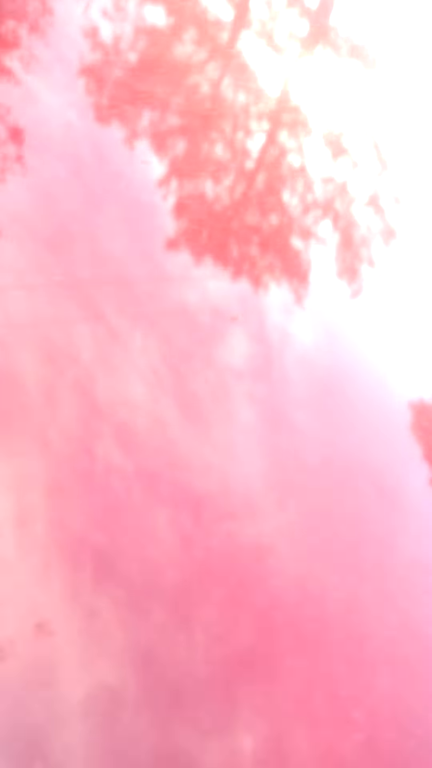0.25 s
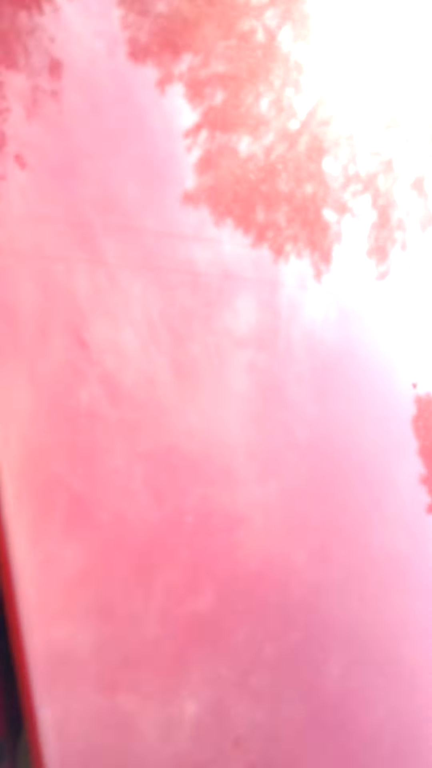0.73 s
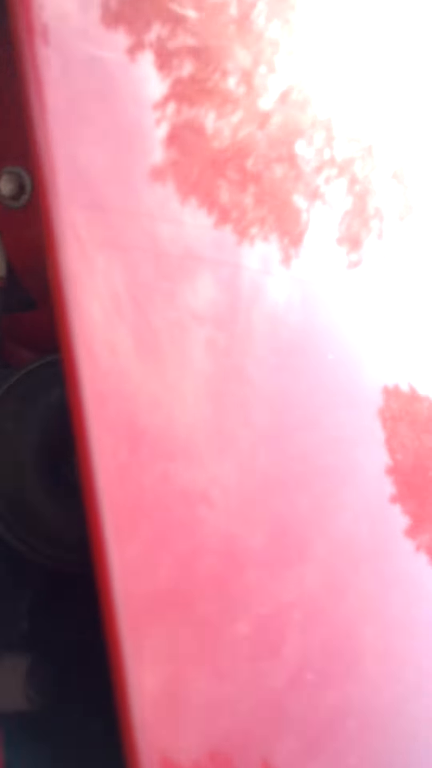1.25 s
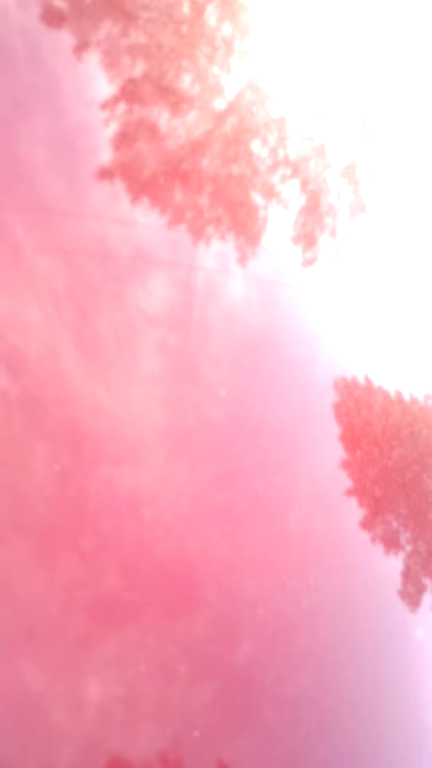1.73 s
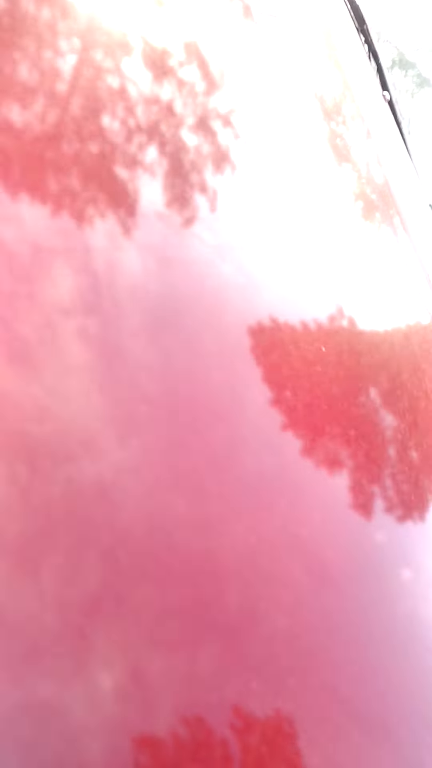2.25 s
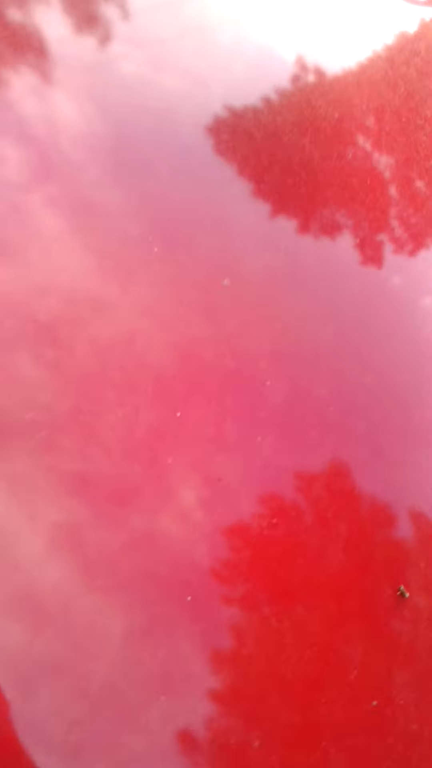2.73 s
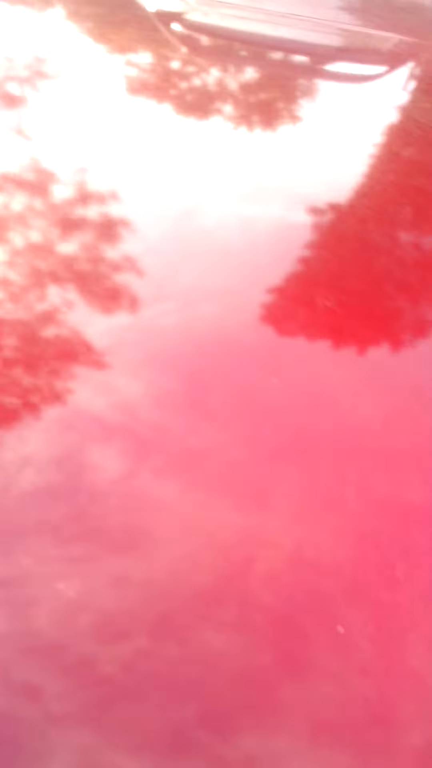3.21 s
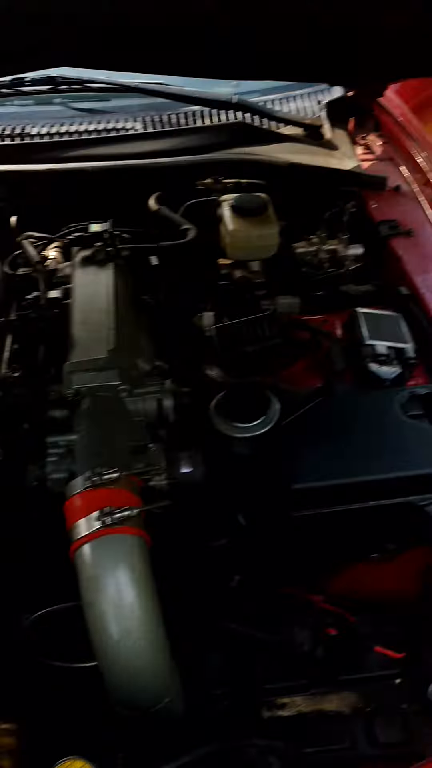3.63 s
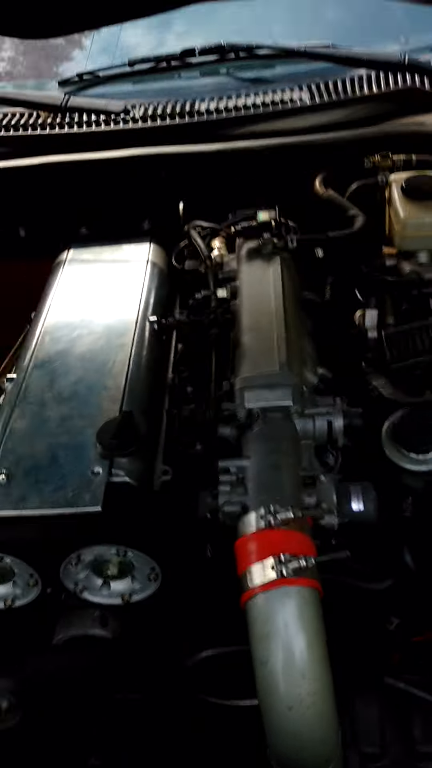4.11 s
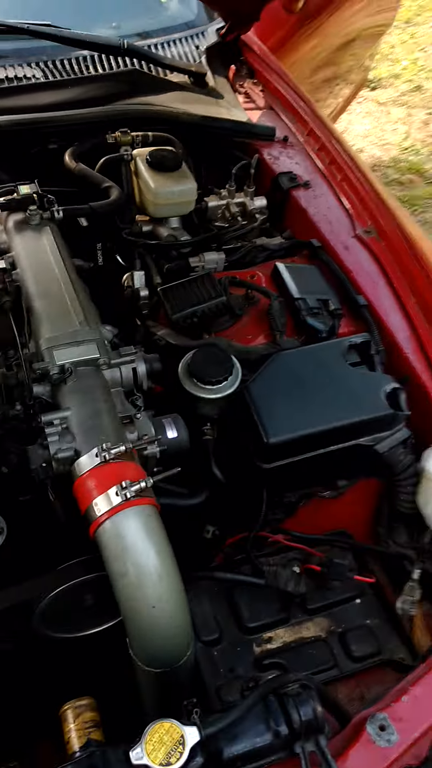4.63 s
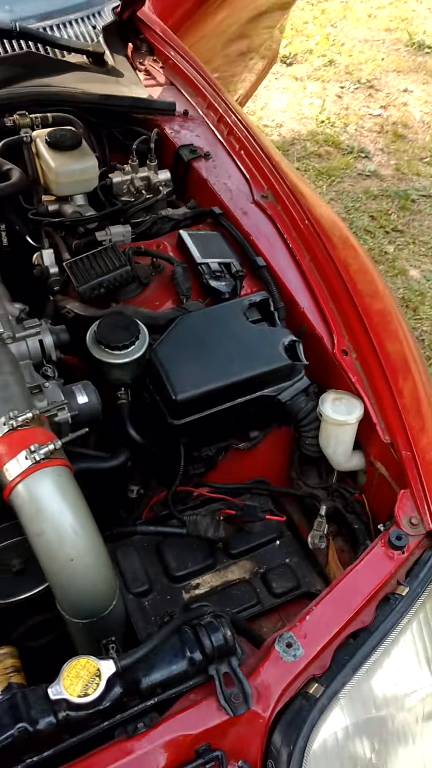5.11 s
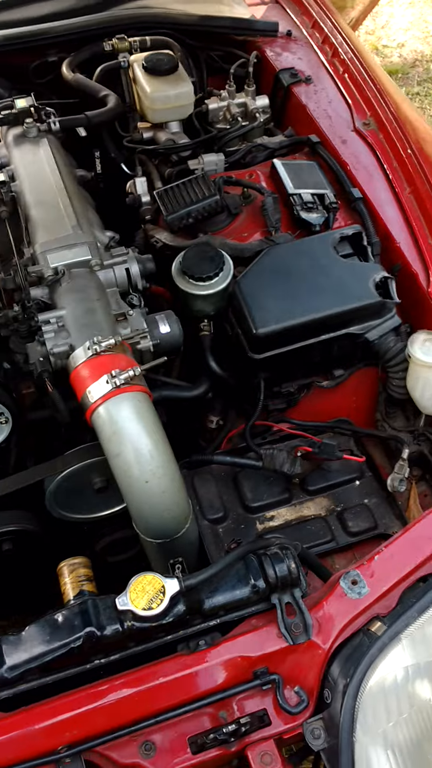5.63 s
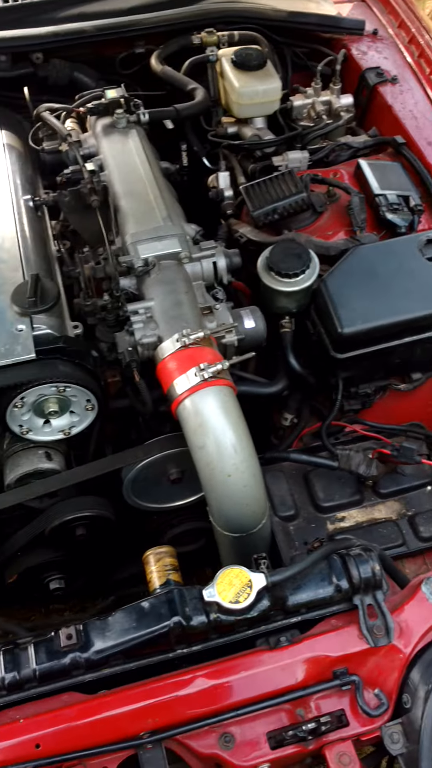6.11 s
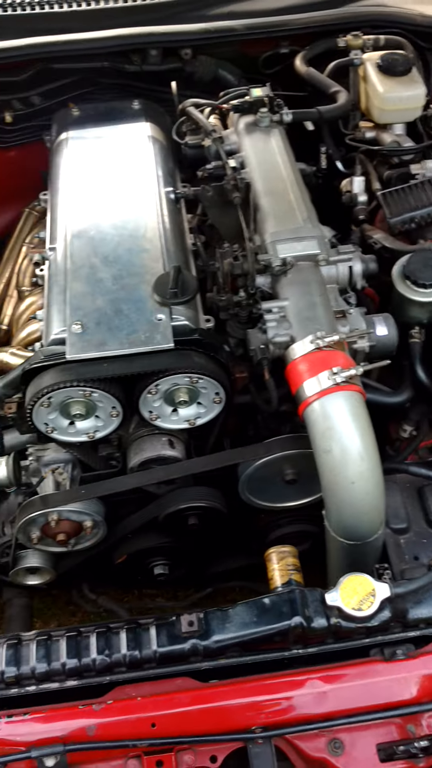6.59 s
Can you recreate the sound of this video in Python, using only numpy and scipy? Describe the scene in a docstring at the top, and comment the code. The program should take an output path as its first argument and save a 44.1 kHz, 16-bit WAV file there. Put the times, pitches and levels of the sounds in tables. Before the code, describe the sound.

Close metallic latch clicks and rattles, a burst of loud clanks, then a car hood creaking and knocking upward outdoors, with faint birds and insects.

```python
"""Opening a car hood outdoors

Close to a hand-held phone a car hood is unlatched, lifted and propped: clicks, clunks and scrapes.
Steel is shaped noise through latch resonances; the panel is a bank of ringing modes, with thin spring tones.
Behind it far traffic, a hum, leaves and crickets are noise bands; birds are gliding tones.
Wind is low noise and single puffs at the microphone.
The phone widens its two ports by taking a delayed copy of each from the other."""
import sys
import numpy as np
from scipy.fft import rfft, irfft, next_fast_len
from scipy.io import wavfile
from scipy.ndimage import uniform_filter1d, map_coordinates

SR = 44100
rng = np.random.default_rng(int(sys.argv[2]) if len(sys.argv) > 2 else 0)


def master_out(mix):
    """Clip the mix to full scale and print it as 16-bit PCM to the path in sys.argv[1]."""
    frames = np.transpose(np.atleast_2d(mix))
    ceiling = np.clip(frames, -1, 1)
    pcm = np.round(ceiling * 32767).astype(np.int16)
    wavfile.write(sys.argv[1], SR, pcm)


N = 302448

# port difference of sound from far off: f/Hz, level against the sum/dB
FAR_APART = [(60, -20.5), (500, -6.5), (900, -2), (2000, 2.5), (3000, 0), (15000, 0)]
# port difference of sound close to the microphone: f/Hz, level against the sum/dB
NEAR_APART = [(60, -17.5), (250, -15), (900, -1.5), (1600, 3.5), (2300, 9.5), (3200, 0.5), (15000, 2)]
# modes of the hood panel: f/Hz, relative level/dB, usual t60/s
PANEL_MODES = [(99, -8, 0.049), (128, -4, 0.15), (153.4, -5.5, 0.14), (195, -5, .08), (225.3, -11.5, 0.31),
               (232.7, 2.5, 0.066), (279, -6, .14), (310, -2.5, 0.11), (349.5, 0, 0.066), (408, -4, .11),
               (455.3, -3, 0.054), (513, -3.5, 0.092), (590.6, -4, 0.087), (658, -5, 0.1),
               (757, -7.5, 0.02), (850, -9.5, .07)]


def amp(db):
    """dB to gain."""
    return 10 ** (np.asarray(db) / 20)


def unit(x):
    """Scaled to rms 1."""
    return x / np.sqrt(np.mean(x ** 2) + 1e-20)


def along(points, hz):
    """Values of (Hz, value) points, joined on a log frequency axis and held beyond the ends."""
    f, value = np.transpose(points)
    return np.interp(np.log(hz + 1), np.log(f + 1), value)


def curves(rows):
    """One value per sample for each column after the time."""
    s, *columns = np.transpose(rows)
    return np.array([np.interp(np.arange(N) / SR, s, column) for column in columns])


def wobble(rate):
    """A smooth random curve, rate knots a second."""
    knots = rng.standard_normal(int(N * rate / SR) + 4)
    return map_coordinates(knots, [np.arange(N) * rate / SR])


def filtered(x, response):
    """x through a complex response of frequency."""
    m = next_fast_len(N + SR // 2)
    spectrum = rfft(x, m) * response(np.fft.rfftfreq(m, 1 / SR))
    return irfft(spectrum, m)[..., :N]


def ports(pair, colour, apart):
    """Coloured sum and difference signals, as heard at the two ports."""
    mid, side = filtered(pair, lambda hz: colour(hz) * amp([0 * hz, along(apart, hz)]))
    return np.array([mid + side, mid - side])


def hiss(spectrum, apart):
    """Noise of rms 1 at the two ports; the spectrum falls on for an octave beyond its ends."""
    closed = [(spectrum[0][0] / 2, -90)] + spectrum + [(spectrum[-1][0] * 2, -90)]
    return unit(ports(rng.standard_normal((2, N)), lambda hz: amp(along(closed, hz)), apart))


def note(s, length):
    """Share of a note gone by, and its soft swell."""
    u = np.clip((np.arange(N) / SR - s) / length, 0, 1)
    return u, np.sqrt(np.abs(np.sin(np.pi * u)))


def traffic(db):
    """Far traffic: low noise, slowly unsteady."""
    # relative spectrum: f/Hz, level per Hz/dB
    rumble_band = [(20, -28), (60, -0.5), (120, 2.5), (250, -4.5), (500, -10), (900, -20.5)]
    return amp(db + 1.2 * wobble(7.2)) * hiss(rumble_band, FAR_APART)


def hum(db):
    """A far mid hum: a noise band with two slow random level curves."""
    # relative spectrum: f/Hz, level per Hz/dB
    hum_band = [(400, -13.5), (800, 5), (1400, 5.5), (2200, 3), (3000, 2.5), (4500, -16.5)]
    return amp(db + wobble(6.9) + 2.5 * wobble(6)) * hiss(hum_band, FAR_APART)


def leaves(db):
    """Rustling leaves: high noise flickering at slow and fast rates."""
    # relative spectrum: f/Hz, level per Hz/dB
    rustle_band = [(1500, -34), (3000, -5), (4500, 2), (8000, -1.5), (11000, -4.5), (15500, -9.5)]
    flicker_db = 1.1 * wobble(25) + wobble(200) + 1.5 * wobble(4)
    return amp(db + flicker_db) * hiss(rustle_band, FAR_APART)


def crickets():
    """Several singers, each a narrow noise swelling at its own chirp rate."""
    # singers: f/Hz, width/Hz, relative level/dB, chirps per second
    singers = [(6470, 130, -4.5, 8), (7200, 110, -4, 4.1), (7150, 63, -4, 30), (7300, 580, 2.5, 55),
               (7470, 130, -5.5, 140)]
    t = np.arange(N) / SR
    song = 0
    for hz, width, db, rate in singers:
        phase = 2 * np.pi * rate * t + .6 * wobble(3)
        swell = (.5 + .5 * np.cos(phase)) ** .3
        band = filtered(rng.standard_normal((2, N)), lambda f: np.exp(-((f - hz) / width) ** 2))
        song = song + amp(db) * unit(swell * band)
    return song


def outdoors():
    """The open-air bed: far traffic, hum, leaves and crickets, each following its own level curve."""
    # levels before the common dip: t/s, traffic/dB, hum/dB, leaves/dB, crickets/dB
    bed_levels = [(0, -64, -54, -39, -70), (.05, -58.5, -64, -54.5, -72), (.13, -56, -55, -53.5, -75),
                  (.175, -59, -63.5, -60, -75), (.21, -51.5, -58.5, -52.5, -65),
                  (.32, -59.5, -60, -57.5, -70), (.4, -58, -56.5, -50, -63), (.48, -48, -55, -49, -65),
                  (.515, -50, -53.5, -61, -74), (.62, -54, -57.5, -48, -70), (.7, -53, -57.5, -58.5, -67),
                  (.8, -54, -54.5, -52.5, -70), (.88, -51.5, -53.5, -54.5, -65),
                  (.93, -49, -51, -55.5, -70), (1.05, -57, -56.5, -59, -66.5), (1.4, -41, -53.5, -61, -69),
                  (1.68, -51, -56.5, -56, -69), (2.1, -52.5, -57, -52.5, -65.5),
                  (2.5, -52.5, -57, -59, -63), (2.8, -42.5, -54, -61, -63), (3.5, -49, -55, -56.5, -61.5),
                  (4.15, -55, -57, -61, -62), (4.7, -52.5, -59.5, -56, -62),
                  (5.3, -53.5, -60, -60.5, -62.5), (6.2, -54.5, -59, -61.5, -62.5),
                  (6.86, -55.5, -56.5, -59.5, -62)]
    traffic_db, hum_db, leaves_db, crickets_db = curves(bed_levels)
    return traffic(traffic_db) + hum(hum_db) + leaves(leaves_db) + amp(crickets_db) * crickets()


def wind():
    """Lumpy low-frequency buffeting, its noise unrelated at the two ports."""
    # buffeting before the common dip: t/s, level/dB
    buffet_levels = [(0, -69), (.5, -71), (1.2, -53), (1.7, -59), (2.4, -55.5), (3, -66.5), (3.75, -48),
                     (4.1, -47.5), (4.5, -59), (5.2, -57.5), (6, -61.5), (6.86, -59)]
    low = filtered(rng.standard_normal((2, N)), lambda f: (f / 80) ** 3 / (1 + (f / 90) ** 4.5))
    lumps_db = 1.4 * np.array([wobble(30), wobble(2.5)])  # one curve for each port
    return amp(curves(buffet_levels)[0]) * unit(low * amp(lumps_db))


def background_dip():
    """Gain on the bed and wind, which sink after the loudest clunks and come back."""
    # t/s, level/dB
    dip_levels = [(1.2, 0.5), (1.34, -12.5), (1.6, -19.5), (1.9, -17.5), (3.5, -0.5)]
    return amp(curves(dip_levels))


def whistle():
    """A distant bird: short notes on arched pitch curves, unsteady in pitch and level."""
    # notes: t/s, length/s, first f/Hz, middle f/Hz, last f/Hz, level before flutter/dB
    whistle_notes = [(0.19, 0.13, 1290, 1340, 1260, -66), (0.408, 0.16, 1000, 1370, 1283, -55.5),
                     (0.633, 0.15, 1400, 1390, 1410, -64), (0.686, 0.027, 1235, 1220, 1240, -57),
                     (0.83, 0.16, 1155, 1127, 1160, -71), (0.988, 0.094, 1410, 1440, 1410, -59),
                     (0.998, 0.038, 1190, 1190, 1230, -61), (6.05, 0.12, 1440, 1430, 1420, -61.5),
                     (6.175, 0.073, 1596, 1585, 1590, -67), (6.192, 0.15, 1446, 1360, 1430, -67),
                     (6.315, 0.093, 1303, 1237, 1210, -63), (6.49, 0.12, 1390, 1376, 1300, -61.5),
                     (6.604, 0.13, 1320, 1307, 1350, -66.5), (6.715, 0.047, 1240, 1240, 1250, -62),
                     (6.738, 0.078, 1380, 1405, 1397, -57), (6.816, .04, 1430, 1405, 1400, -61)]
    tone, waver, flutter_db = 0, 1 + .02 * wobble(160), 2 * wobble(60)
    for s, length, first_hz, middle_hz, last_hz, db in whistle_notes:
        u, swell = note(s, length)
        straight = first_hz + (last_hz - first_hz) * u
        arch = (2 * middle_hz - first_hz - last_hz) * 2 * u * (1 - u)
        turn = 2 * np.pi * np.cumsum((straight + arch) * waver) / SR
        tone = tone + swell * amp(db + flutter_db) * np.sin(turn)
    return np.array([tone, tone])


def bird():
    """A falling nasal call, twice: a few harmonics reaching one port a little earlier."""
    # calls: t/s, first f of the fundamental/Hz, relative level/dB
    calls = [(5.993, 853, -56.5), (6.352, 846, -52)]
    # harmonics: multiple of the fundamental, relative level/dB
    throat = [(2, -6), (3, -1), (4, -2), (7, -20)]
    length_s = 0.2
    fall, bend = 0.066, 2.3  # share of the pitch lost by the end; the fall comes later the higher the bend
    call = 0
    for s, hz, db in calls:
        u, swell = note(s, length_s)
        pitch = hz * (1 - fall * u ** bend + 0.012 * wobble(300))
        turn = 2 * np.pi * np.cumsum(pitch) / SR
        voice = sum(amp(level) * np.sin(round(k) * turn) for k, level in throat)
        call = call + swell * amp(db + 3.3 * wobble(60)) * voice
    return np.array([call, np.roll(call, shift=9)]) * amp(1.5)  # shift in samples


def puffs():
    """Single puffs of about one cycle on the microphone, pushing the two ports unevenly."""
    # t/s, level at the first port/dB, f/Hz
    gusts = [(3.63, -28, 140), (3.737, -23.5, 101), (3.76, -31, 70), (3.84, -27, 90), (3.879, -31, 149),
             (3.962, -19, 136), (4.018, -21, 129)]
    t = np.arange(N) / SR
    air = 0
    for s, db, hz in gusts:
        bell = np.exp(-(2.0 * hz * (t - s)) ** 2)
        air = air - amp(db) * np.cos(2 * np.pi * hz * (t - s)) * bell
    return air * np.array([[1], [.3]])


def rings():
    """A thin spring sings on after some contacts: decaying sines with a wavering phase."""
    # t/s, f/Hz, starting level/dB, t60/s
    spring_tones = [(1.381, 1288, -71.5, 1.8), (4.033, 1370, -55, 0.58), (4.1, 1317, -58, 1.2)]
    t, waver = np.arange(N) / SR, 0.84 * wobble(22)
    tone = 0
    for s, hz, db, t60 in spring_tones:
        decay = amp(db - 60 * np.abs(t - s) / t60) * (t > s)
        tone = tone + decay * np.sin(2 * np.pi * hz * t + waver)
    return np.array([tone, tone])


def thump(db, hz, t60):
    """A blow on the panel: modes near its pitch ring most, nearly in step, and the whole hood rocks."""
    usual_s, rise_s = 0.07, .0025  # contact t60 that leaves the modes their own decay; attack
    push_db, push_hz, push_s = -25.5, 65, .08  # rocking: level relative to the panel, pitch, t60
    t = np.arange(SR // 4) / SR
    f, level, life = np.transpose(PANEL_MODES)
    life = life * np.clip(t60 / usual_s, .2, 2)
    ring = np.exp(np.outer(2j * np.pi * f - np.log(1000) / life, t))
    octaves = np.log2(f / hz)
    level = level - 11 * octaves ** 2 - 3 * octaves
    level = level + rng.normal(0, 1.8, (2, len(f)))  # each mode at a new strength, in sum and difference
    level = level + np.array([0 * f, along(NEAR_APART, f)])
    start = np.exp(1j * rng.normal(0, 0.84, level.shape))
    mid, side = np.imag(amp(level) * start @ ring)
    side = side + amp(push_db - 60 * t / push_s) * np.sin(2 * np.pi * push_hz * t)
    return amp(db + 7.0) * np.array([mid + side, mid - side]) * (1 - np.exp(-(t / rise_s) ** 2))


def contacts():
    """Blows of part on part: gains of five steel bands, panel thumps and left-right balance."""
    # levels relative within each layer: t/s, sizzle/dB, clank/dB, knock/dB, panel/dB, panel f/Hz, t60/s,
    # left-right/dB, air/dB, first crack against the decay/dB
    blows = [(0.0018, -23.5, -39, -58, -53.5, 360, 0.03, 4, -29, 11),
             (0.0725, -37, -74, -45.5, -62, 680, 0.052, -6, -42, 9),
             (0.1381, -37, -62, -40.5, -51.5, 695, 0.059, -3, -61, 4),
             (0.2554, -25, -27, -58, -72.5, 358, 0.065, 3, -38, -9),
             (0.3395, -26.5, -28.5, -44.5, -48.5, 550, 0.063, 0.5, -42, 2),
             (0.5534, -21, -38, -35, -70, 401, 0.075, -7, -34, 5),
             (0.555, -15.5, -24.5, -73, -79, 401, 0.13, -1, -23, 15),
             (0.727, -10, -19.5, -39.5, -73, 598, 0.08, 1.5, -21, 2),
             (0.9543, -27.5, -54, -41, -41, 350, 0.045, -9.5, -45, 5),
             (0.974, -42, -60, -51, -54, 330, 0.037, -4, -38, 5),
             (0.985, -26.5, -54, -43, -43, 326, 0.011, -4, -57.5, 19.5),
             (1.0686, -62, -50, -23.5, -18.5, 311, 0.051, 4, -65, 2),
             (1.1016, -43, -53, -44, -40, 357, 0.058, -3, -61, 14),
             (1.1364, -40, -30, -38.5, -26, 400, 0.032, -2, -52, 4),
             (1.1552, -28, -32, -26.5, -30, 600, 0.045, -4, -48, 7),
             (1.168, -33, -30, -22, -27, 357, 0.048, 11, -50, 8),
             (1.178, -24, -21, -45, -26, 353, 0.076, -10, -42, 2),
             (1.184, -22, -24, -36, -26, 450, 0.025, 2, -36, 6),
             (1.19, -26, -26, -26, -26.5, 374, 0.036, -5, -40, 6),
             (1.198, -6, -12, -34, -50, 383, 0.05, 1.5, -17, 20.5),
             (1.2281, -16.5, -21, -15, -25, 510, 0.049, -7.5, -36, 11),
             (1.236, -31, -19, -32, -38, 600, 0.02, -4, -40, 5),
             (1.2659, -63, -49, -40.5, -36, 267, 0.086, -2, -54.5, 3),
             (1.2892, -35, -48, -51.5, -56, 294, 0.031, -2, -41, 22),
             (1.3329, -8, -15, -27, -26.5, 410, 0.034, 3, -25, 10),
             (1.343, -12, -15, -37.5, -34, 331, 0.023, 3, -31, -2),
             (1.6981, -68.5, -77.5, -58.5, -59, 303, 0.078, 4.5, -67.5, -4.5),
             (1.7338, -59, -68, -60, -58, 288, 0.24, -3, -67, 0.5),
             (1.7709, -31, -27.5, -39.5, -37, 394, 0.054, -6, -52.5, 11.5),
             (2.1434, -62, -62.5, -61, -83, 593, 0.076, 1, -70.5, 3),
             (2.2453, -71, -72.5, -53, -55.5, 281, 0.064, -1, -77, 2),
             (2.3459, -60, -47.5, -33, -24.5, 153, 0.039, -8, -79, 2),
             (2.3926, -50, -55, -53, -38, 144, 0.073, 3, -78, 3),
             (2.571, -65, -70, -54, -40.5, 250, 0.061, 2, -68, 2),
             (2.5861, -32.5, -30, -35, -40.5, 300, 0.056, 0.5, -47, 4),
             (2.6231, -55.5, -66, -44.5, -41.5, 224, 0.047, -13, -72, 10),
             (2.6882, -48, -66, -49, -47, 345, 0.075, -11.5, -59, 10),
             (2.7253, -40, -43.5, -37, -34.5, 520, 0.052, -13, -56, 4),
             (2.762, -38, -65, -33, -35, 431, 0.02, 2, -50, 7),
             (2.775, -55, -72, -51, -44, 400, 0.044, -3, -64.5, 5),
             (2.8023, -47, -85, -40.5, -41, 347, 0.032, -1, -69, 21),
             (2.919, -43, -52, -45, -56, 400, 0.038, -3, -53, 12),
             (2.937, -43, -40.5, -31.5, -31.5, 504, 0.043, -16.5, -60, 0),
             (2.9424, -59, -55, -34, -20, 248, 0.074, 3, -68, 26),
             (3.262, -63, -47, -34, -36.5, 490, 0.073, -20, -68, 11),
             (3.274, -62, -64, -46, -22, 248, 0.067, 20, -66, 11),
             (3.3553, -44, -49, -41.5, -42.5, 249, 0.072, -2, -42, 6),
             (3.571, -64, -60, -53, -45, 199, 0.14, 10, -68, 3),
             (3.641, -58, -51, -58, -46, 330, 0.049, 13, -66, 5),
             (3.991, -49, -59, -46.5, -47.5, 415, 0.32, 4, -56, 5.5),
             (4.032, -38.5, -39.5, -29.5, -34.5, 450, 0.091, -11, -56, 19),
             (4.046, -51, -69, -49, -29, 138, 0.12, 0, -52, 1),
             (4.0613, -33, -60, -53, -52, 300, 0.038, -3, -41.5, 7),
             (4.0984, -43, -75, -39.5, -44, 428, 0.11, -1, -53, 7),
             (4.169, -52, -55, -50, -45.5, 284, 0.087, 1, -48, 3),
             (4.422, -50, -46.5, -58, -57, 405, 0.048, 7, -43, 6),
             (4.5561, -40, -39.5, -43.5, -41, 436, 0.12, 6.5, -50, 13),
             (4.575, -58, -44, -47, -43, 420.7, 0.048, -1, -55, 4),
             (4.5883, -58.5, -56, -53, -41, 423, 0.054, 9, -54, 6),
             (5.5565, -51, -62, -72, -73, 380, 0.12, -12, -50, 6),
             (5.7066, -30.5, -51.5, -61, -73, 483, 0.13, -9, -43, 11),
             (5.83, -55, -78, -54, -48.5, 298, 0.092, -2, -70.5, 6.5),
             (5.9344, -16.5, -38.5, -52, -68, 470, 0.089, -16, -35, 5),
             (5.9522, -23.5, -40, -67, -53, 121, 0.084, 2, -44, 9),
             (5.9714, -36, -47, -60, -68, 484, 0.45, 1, -51, 5),
             (6.8149, -34, -46, -67, -50, 120, 0.068, 1, -55.5, 3)]
    sizzle_trim_db, tap_db = -6, 3  # tap is relative to the mean of clank and knock
    rise_s, crack_s = 0.0014, 0.0036  # attack of a contact; t60 of its first crack
    force, panel, pan = np.zeros((5, N + SR)), np.zeros((2, N + SR)), np.ones((2, N + SR))
    t = np.arange(SR // 4) / SR
    for s, sizzle_db, clank_db, knock_db, panel_db, hz, t60, pan_db, air_db, crack_db in blows:
        i = round(s * SR)
        fade = amp(-60 * t / max(t60, .01))
        tail = 0.0026 * fade ** .3
        crack = amp(crack_db - 60 * t / crack_s)
        shape = (fade + tail + crack) * (1 - np.exp(-t / rise_s))
        mean_db = (clank_db + knock_db) / 2
        bands_db = [sizzle_db + sizzle_trim_db, air_db, clank_db, mean_db + tap_db, knock_db]
        force[:, i:i + len(t)] += amp(bands_db)[:, None] * shape
        panel[:, i:i + len(t)] += thump(panel_db, hz, t60)
        pan[:, i:] = amp([[pan_db / 2], [-pan_db / 2]])  # held until the next contact
    return force[:, :N], panel[:, :N], pan[:, :N]


def strokes():
    """Sizzle, clank and panel gain of metal and hand sliding on metal, swelling and dying away."""
    # t start/s, t loudest/s, t end/s, relative sizzle/dB, clank/dB, panel/dB
    scrapes = [(0.04, 0.07, 0.111, -52, -58.5, -55.5), (0.387, 0.45, 0.44, -40, -48.5, -37.5),
               (0.456, 0.478, 0.44, -47, -36, -56), (1.119, 1.15, 1.184, -42, -40, -19.5),
               (1.161, 1.192, 1.148, -34.5, -23.5, -21), (1.199, 1.218, 1.225, -39, -37.5, -36.5),
               (1.239, 1.25, 1.315, -59.5, -50, -32), (1.344, 1.352, 1.373, -48.5, -32.5, -32.5),
               (0.747, 0.765, 0.86, -44, -43.5, -91), (2.243, 2.243, 2.8, -81, -81, -58),
               (2.151, 2.189, 2.16, -51.5, -52, -59), (2.529, 2.612, 2.624, -67, -69, -39),
               (2.675, 2.716, 2.806, -53.5, -47.5, -32.5), (3.562, 3.63, 3.8, -76, -61.5, -45.5),
               (3.667, 3.736, 3.83, -56, -56, -46.5), (4.104, 4.101, 4.25, -55.5, -47, -39),
               (4.18, 4.279, 4.36, -47, -54, -41.5), (4.3, 4.333, 4.32, -72, -70, -48.5),
               (4.543, 4.594, 4.54, -58, -43, -37), (4.77, 4.805, 5.1, -54.5, -64.5, -51.5),
               (5.04, 5.094, 5.14, -49, -57, -80), (5.28, 5.365, 5.67, -85, -58.5, -48.5),
               (6.425, 6.479, 6.5, -54, -53, -81), (6.78, 6.818, 6.85, -51, -50.5, -68)]
    edge_db, fade_s = -19, 0.025  # ends of a stroke under its top; dying away after the end
    gain = np.zeros((3, N))
    for start, top, end, *db in scrapes:
        # an end set before the top cuts the stroke short
        i = np.arange(round(start * SR), min(round((end + fade_s) * SR), N))
        swell_db = np.interp(i / SR, [start, top, end, end + fade_s], [edge_db, 0, edge_db, 2 * edge_db])
        gain[:, i] += amp(swell_db + np.array(db)[:, None])
    return gain


def sliding():
    """Scrapes as gains of the five steel bands and the panel, in quick stick-and-slip grains."""
    knock_db, air_db, tap_db = -5, 0, 7  # to the means of clank and panel, to sizzle, to clank and knock
    sizzle, clank, rub = strokes()
    knock = amp(knock_db) * np.sqrt(clank * rub)
    tap = amp(tap_db) * np.sqrt(clank * knock)
    slide = np.array([sizzle, amp(air_db) * sizzle, clank, tap, knock, rub])
    grains_db = 3.13 * wobble(250) + 2.2 * wobble(40) - 0.5
    slide = uniform_filter1d(slide, size=200) * amp(grains_db)
    return slide[:5], slide[5]


def resonance(f, hz, width):
    """A band-pass resonance of gain 1 at its centre."""
    return 1j * f * width / (hz * hz - f * f + 1j * f * width)


def steel_parts(force):
    """Five close noise bands, from sizzle down to knock, driven by the contact forces."""
    # relative spectra of the bands: f/Hz, level per Hz/dB
    sizzle_band = [(4000, -8.5), (5500, -6), (7000, -2), (9500, -6.5), (11000, -18.5)]
    air_band = [(9000, -20), (10500, 7), (12000, 2), (14500, -2), (15700, -10.5)]
    clank_band = [(2100, -25), (2600, -6), (3100, 0), (4200, -2), (5200, 0), (6000, -24)]
    tap_band = [(1100, -25), (1500, 0), (2200, 0), (2700, 0), (3200, -25)]
    knock_band = [(500, -20), (750, 0), (1100, -1), (1500, -8), (2000, -30)]
    bands = [sizzle_band, air_band, clank_band, tap_band, knock_band]
    return sum(f * hiss(band, NEAR_APART) for f, band in zip(force, bands))


def latch(f):
    """Response of the latch: its resonances added to the direct sound."""
    # f/Hz, level against the direct sound/dB, width/Hz
    latch_modes = [(940, 5, 90), (1160, 4, 90), (1350, 4, 110), (1790, 4, 110), (2050, 3, 110),
                   (2770, 5, 130), (3000, 6, 100), (3190, 5, 130), (3700, 4, 220), (5700, 5, 300),
                   (6500, 3, 300), (9100, 4, 400)]
    return 1 + sum(amp(db) * resonance(f, hz, width) for hz, db, width in latch_modes)


def rubbed_sheet(f):
    """Response of the panel to rubbing, which wakes the low modes more."""
    tilt_db = -3  # per octave
    response = 0
    for k, (hz, db, t60) in enumerate(PANEL_MODES):
        level_db = db + tilt_db * np.log2(hz / 300)
        response = response + (-1) ** k * amp(level_db) * resonance(f, hz, 2.2 / t60)
    return response


def hood():
    """Blows and scrapes rattle the steel parts and drive the modes of the big panel."""
    force, panel, pan = contacts()
    slide, rub = sliding()
    chatter_db = 2.8 * wobble(1500) + 1.2 * wobble(450)  # a contact chatters as it settles
    parts = steel_parts(force * amp(chatter_db) + slide)
    steel = amp(-9.5) * filtered(parts * pan, latch)
    struck = filtered(panel, lambda f: (1j * f / (45 + 1j * f)) ** 2)  # low cut at 45 Hz
    rubbed = ports(amp(16.5) * rub * rng.standard_normal((2, N)), rubbed_sheet, NEAR_APART)
    return steel + struck + rubbed


def scene():
    """All sources at the two microphone ports."""
    background = background_dip() * (outdoors() + wind())
    return background + whistle() + bird() + puffs() + rings() + hood()


def record(dry):
    """The phone: each port loses a delayed copy of the other, peaks round off, bass and top are cut."""
    # f/Hz, share of the other port taken away
    cross_share = [(60, .85), (600, .75), (1500, .85), (2500, .93), (5000, .9), (7500, .75), (10000, .88),
                   (15000, .65)]
    notch_hz, drift = 2430, .008  # the delay is 1 / (notch_hz + drift * f) seconds
    top_hz, bass_hz = 15950, 35

    def crossing(hz):
        delay_s = 1 / (notch_hz + drift * hz)
        return np.clip(along(cross_share, hz), 0, 1) * np.exp(-2j * np.pi * hz * delay_s)

    wide = dry - filtered(dry[::-1], crossing)
    wide = wide / (1 + np.abs(wide) ** 6) ** (1 / 6)
    return filtered(wide, lambda hz: (hz < top_hz) * 1j * hz / (bass_hz + 1j * hz))


dry = scene()
out = record(dry)
master_out(out)
```